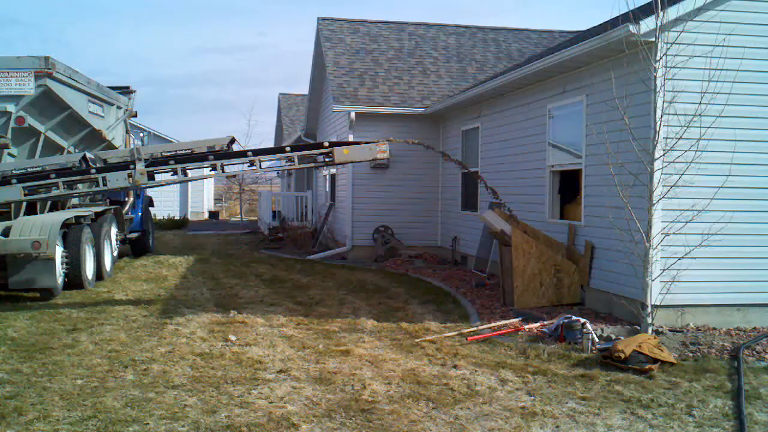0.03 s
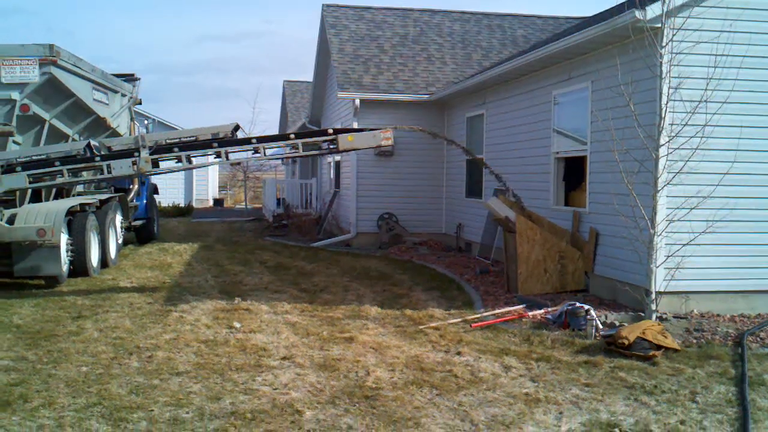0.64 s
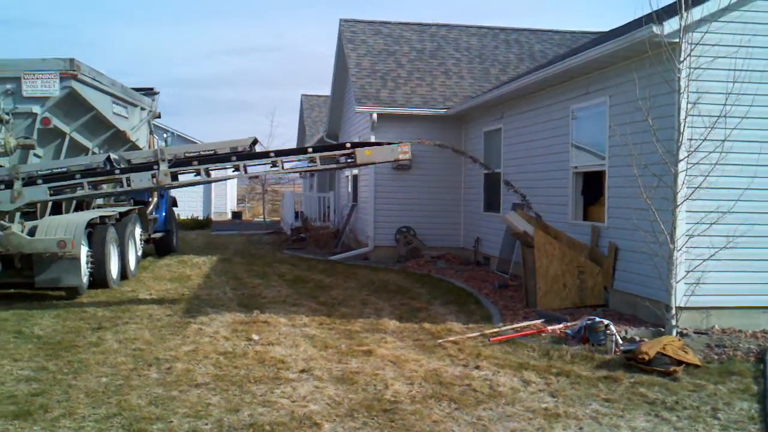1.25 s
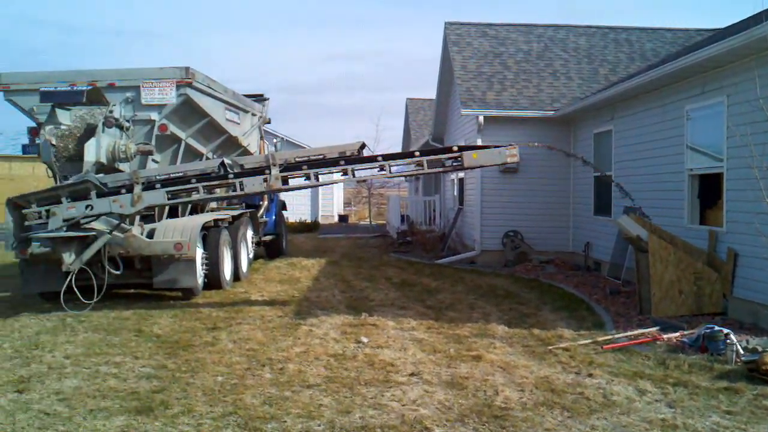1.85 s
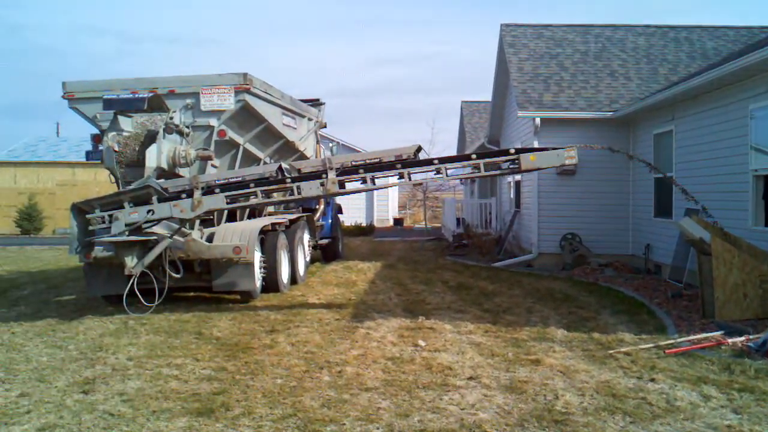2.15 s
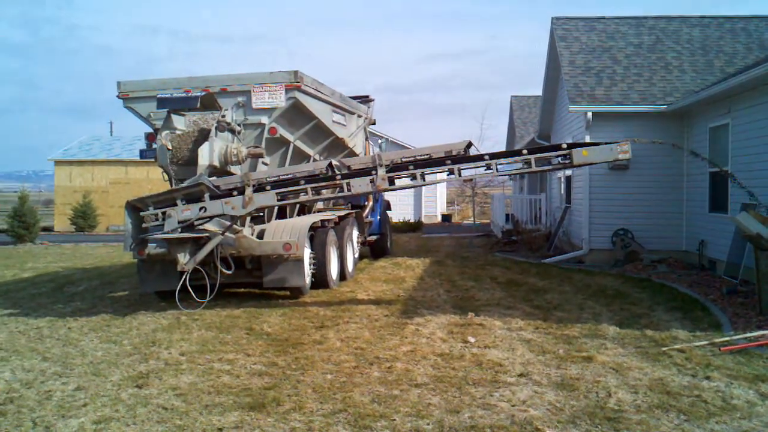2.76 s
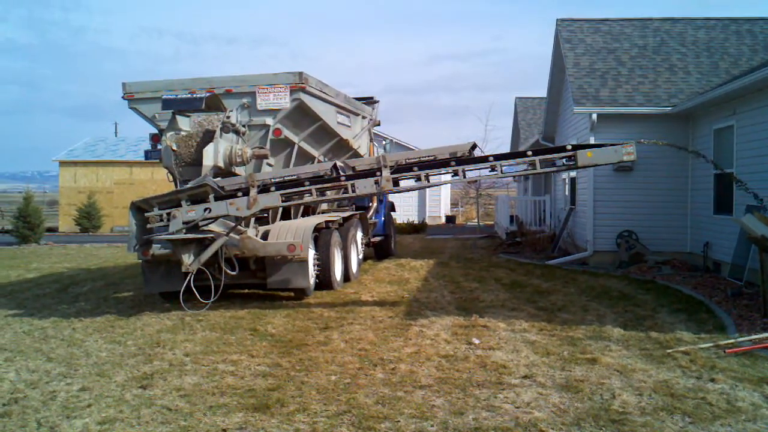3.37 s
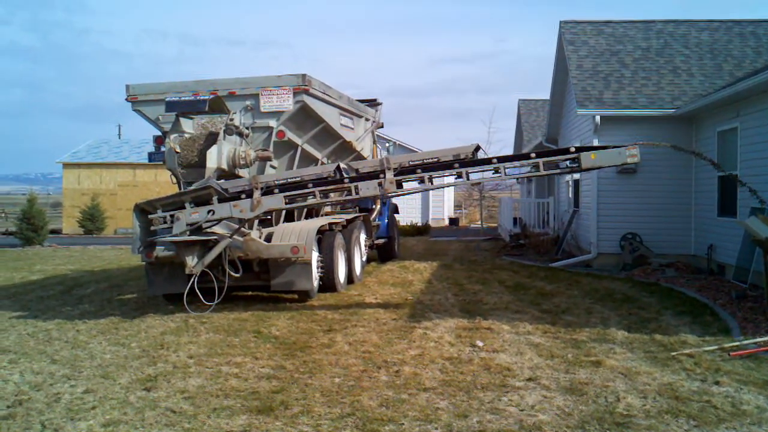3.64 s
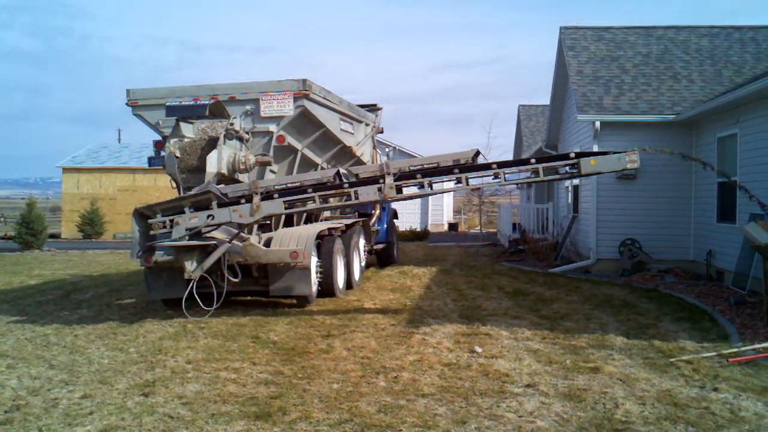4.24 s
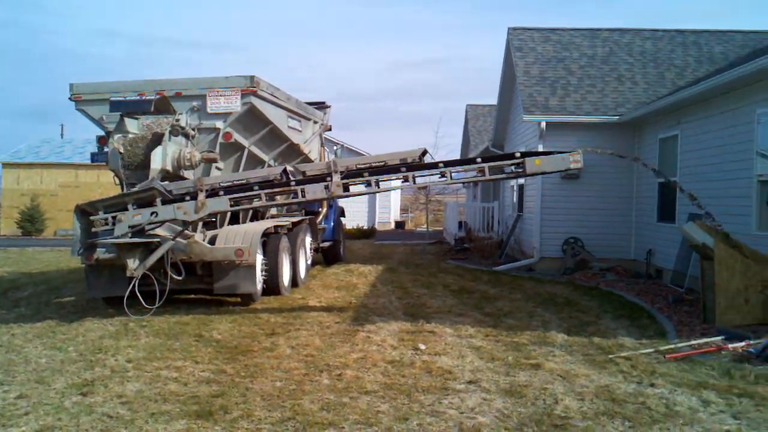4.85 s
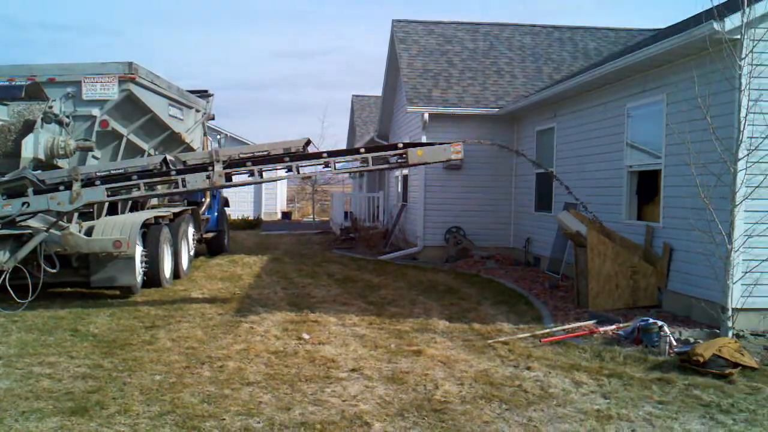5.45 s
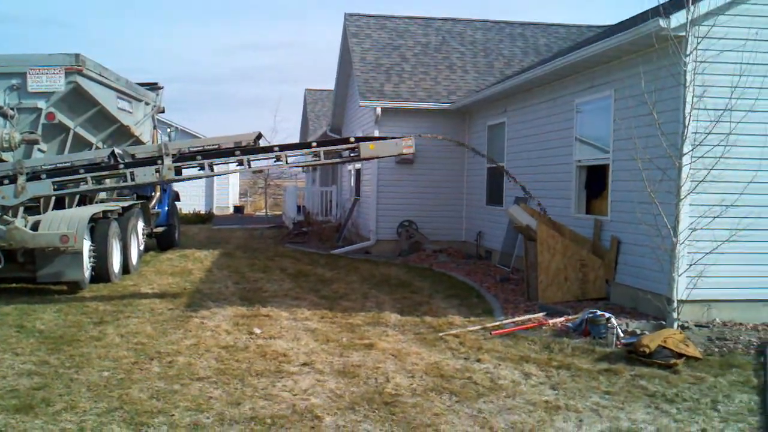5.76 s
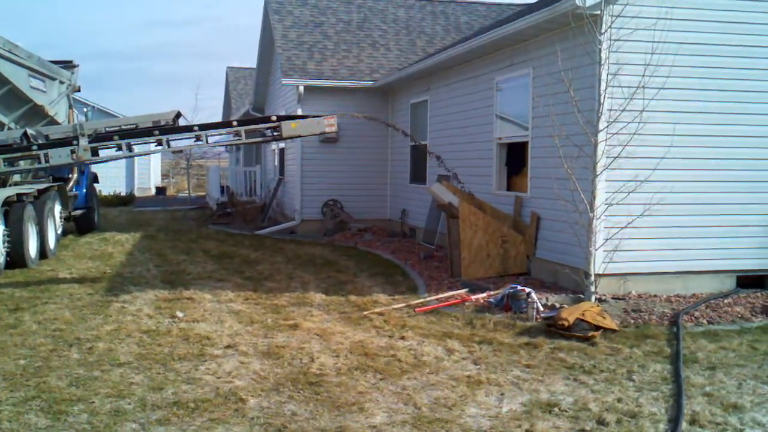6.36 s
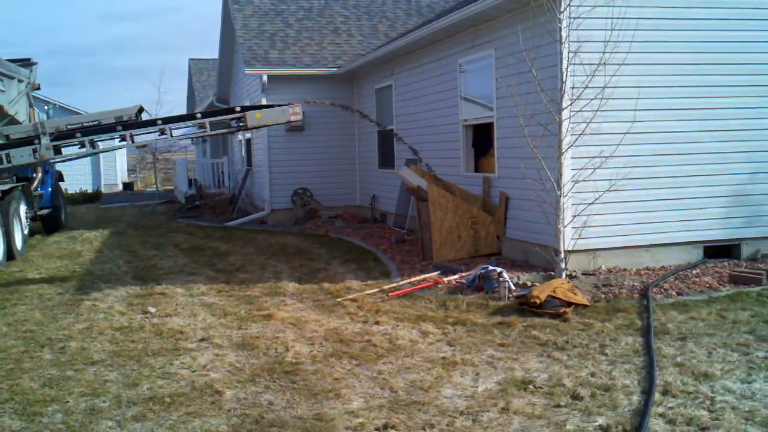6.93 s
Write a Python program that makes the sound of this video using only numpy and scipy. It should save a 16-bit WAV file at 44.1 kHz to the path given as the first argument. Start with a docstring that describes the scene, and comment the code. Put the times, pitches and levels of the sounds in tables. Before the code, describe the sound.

Gravel pours onto a wooden chute with constant rattling and occasional knocks, over a loud, high-revving diesel truck outdoors.

```python
"""A conveyor truck runs at high revs on a lawn and slings gravel down a plywood chute at a house window.
Its diesel engine roars and throbs, and its hydraulic pump whines on one note. The gravel drums on the
board, stones rattle against each other, and now and then a big one lands with a knock.
The sound fades in, heard through a widened stereo microphone that turns toward the truck and back."""
import sys
import numpy as np
from scipy import signal
from scipy.fft import rfft, irfft, next_fast_len
from scipy.io import wavfile
from scipy.ndimage import map_coordinates

SR = 44100
rng = np.random.default_rng(int(sys.argv[2]) if len(sys.argv) > 2 else 0)


def unload_wav(signal):
    """Save mono or channel-first audio to the path in sys.argv[1] as 16-bit WAV at rate SR, clipped to [-1, 1]."""
    wavfile.write(
        sys.argv[1],
        SR,
        np.round(np.clip(np.atleast_2d(signal).T, -1, 1) * 32767).astype(np.int16),
    )


N = 317520

# tone of the exhaust and fan noise: (frequency [Hz], level [dB])
ROAR_TONE = [(25, -41), (50, -31), (95, -21), (118, -9), (145, -6), (175, 0.5), (215, 1.5), (290, -0.5),
             (400, -1), (490, -4.5), (900, -12.5), (1600, -11), (2600, -34.5)]
# notes in the engine's hum: (frequency [times the crankshaft rate], level [dB])
HUM_NOTES = [(3, -27), (4, -17), (6, -8), (7, -2), (8, -5.5), (9, -5.5), (12, -6.5)]
# notes the plywood chute rings at: (frequency [Hz], width [Hz], level [dB])
BOARD_NOTES = [(533.5, 29.6, -6.5), (616.8, 88.4, 0.5), (715, 133, 1.5), (959, 232, -9.5), (1387, 264, -13),
               (2250, 360, -21)]
# how much gravel leaves the belt: (time [s], flow above average [dB])
GRAVEL_FLOW = [(0.98, -1.5), (1.28, 0), (1.58, -0.45), (2.18, -0.7), (2.88, 0.6), (3.48, -0.5), (3.68, 0.5),
               (3.88, -0.4), (4.38, 1.0), (4.78, 0.1), (5.08, 1.2), (5.18, -0.7), (5.48, -1.4), (5.78, 0.4),
               (6.28, 1.5), (6.38, 0.2), (7.18, 0.7)]
# tone of the stone rattle: (frequency [Hz], level [dB])
RATTLE_TONE = [(400, -45), (1200, 10.5), (2200, 9), (2700, 4.5), (3300, -1), (4200, 5), (5400, -4.5),
               (6500, -0.5), (7800, 0), (9200, 0.5), (11000, -6.5), (14000, -0.5)]
# big stones hitting the board: (time [s], strength [dB])
BIG_STONE_HITS = [(0.912, -11), (1.331, -6.5), (2.219, -4.5), (4.451, -7.5), (4.556, -8.5), (5.009, -10),
                  (6.007, -10.5), (6.581, -7), (6.834, -14), (7.145, -10)]
# level of mid (what left and right share) and side (what sets them apart),
# with a narrow hollow in the mid near 2.7 kHz: (frequency [Hz], mid [dB], side [dB])
STEREO_WIDTH = [(30, -1, 0), (86.8, -0.5, 3), (170, -1, -20), (424, 1, -8.5), (680, -0.5, -17),
                (1030, 0, -14), (1820, -3.5, -2.5), (2150, 2.5, -6), (2393, -1, -4), (2720, -20, -6),
                (2836, 0, -8), (3300, 0, -2), (5000, 0, -0.5), (13000, -0.5, 0)]
# where the microphone points: (time [s], direction [0 = house, 1 = truck])
MIC_HEADING = [(1.45, 0.43), (2.08, 0.71), (2.65, 0.87), (4.6, 0.9), (5.15, 0.63), (5.8, 0.37)]
# the microphone's tone: (frequency [Hz], facing the house [dB], facing the truck [dB])
MIC_TONE = [(100, -2.5, 0.5), (616, 0.5, -.5), (965, -2.5, .5), (1380, 0.5, -1.5), (2200, 0.5, -8),
            (3300, -7.5, 6), (3800, -0.5, 0), (4750, -1.5, -1.5), (5940, 7, -6), (7270, -9.5, 0.5),
            (8900, 5, -6.5), (11600, -4, 1.5), (13500, -6.5, -9.5)]
# how much louder left is than right: (frequency [Hz], facing the house [dB], facing the truck [dB])
MIC_BALANCE = [(35, 0, 4), (100, -2, -6.5), (440, 7, -1.5), (705, 3.5, -2), (1330, 3, -9.5),
               (1710, -7, -8.5), (2280, 3, 19.5), (3040, 6, -14), (3960, 4, -3), (6000, -1.5, 3),
               (8000, 0, -0.5)]
# how much of the other channel the widener subtracts: (frequency [Hz], from left [0-1], from right [0-1])
WIDENER_SHARE = [(404, .02, 0.017), (820, 0.25, 0.27), (1280, 1, 0.92), (2650, 1, 1), (4270, 0.51, 0.64),
                 (4700, 0.34, 0.13), (5370, 0.25, 0.62), (5770, .03, 0.46), (13000, .03, 0.36)]

CRANKSHAFT_HZ, ENGINE_DB = 29.13, -31.5
PUMP_HZ, PUMP_DB = 716.3, -33.0
DRUM_DB, DRUM_GROWTH = -21.5, 0.8  # growth: dB gained per dB of gravel flow
RATTLE_DB, RATTLE_GROWTH, RATTLE_FACING_TRUCK_DB = -27.5, 1.1, 0.55
BELT_SHAKE_HZ = 17.6  # how often the belt shakes a clump loose
COMB_HOUSE_HZ, COMB_TRUCK_HZ = 2774, 2496  # one over the widener's delay, facing each way
FADE_START_S, FADE_END_S = 0.711, 0.96
TOP_HZ = 13910  # the highest pitch heard


def amp(db):
    """Turn decibels into a number to multiply by."""
    return 10 ** (np.asarray(db) / 20)


def unit(x):
    """Scale a sound to an average (rms) level of 1."""
    return x / np.sqrt(np.mean(x ** 2) + 1e-20)


def at_pitch(table, hz):
    """Read a table's columns at the given frequencies, on a log scale."""
    freqs, *columns = np.transpose(table)
    return np.squeeze([np.interp(np.log(hz + 1), np.log(freqs + 1), column) for column in columns])


def over_time(table):
    """Join (time, value) rows with straight lines, one value per sample."""
    times, values = np.transpose(table)
    return np.interp(np.arange(N) / SR, times, values)


def wobble(rate):
    """A smooth curve through `rate` random values a second."""
    return map_coordinates(rng.standard_normal(int(N * rate / SR) + 4), [np.arange(N) * rate / SR])


def filtered(x, response):
    """Change a sound's tone: multiply each frequency by response(hz)."""
    size = next_fast_len(N + SR // 2)
    hz = np.fft.rfftfreq(size, 1 / SR)
    return irfft(rfft(x, size) * response(hz), size)[..., :N]


def impacts(per_second, spread_db):
    """Tiny blows at random times and of random size, as mid and side."""
    hits = rng.random((2, N)) < per_second / SR
    signs = np.sign(rng.standard_normal((2, N)))
    sizes = amp(spread_db * rng.standard_normal((2, N)))
    return unit(hits * signs * sizes)


def diesel_engine():
    """Six cylinders fire three times a turn, so the exhaust and fan noise throbs over the shaft's hum."""
    angle = 2 * np.pi * np.cumsum(CRANKSHAFT_HZ * (1 + 0.00394 * wobble(3.015))) / SR
    firing = np.cos(3 * angle)
    throb = amp(1.4 * firing + 1.06 * wobble(11))
    rough_noise = throb * impacts(5000, spread_db=1.5)
    roar = unit(filtered(rough_noise, lambda hz: amp(at_pitch(ROAR_TONE, hz))))
    hum = unit(sum(amp(db + 2.3 * wobble(9)) * np.sin(multiple * angle + 0.7 * wobble(14))
                   for multiple, db in HUM_NOTES))
    return roar + amp(-7.0) * hum * [[1], [0]]  # the hum is mid only


def hydraulic_pump():
    """The conveyor's pump whines on one note that wavers in the moving air."""
    phase = 2 * np.pi * np.cumsum(PUMP_HZ * (1 + 0.0025 * wobble(12))) / SR
    whine = unit(np.array([np.sin(phase), np.cos(phase)]))
    return amp(3.9 * wobble(7)) * whine


def plywood_board(hz):
    """How strongly the chute answers each frequency: it bends and rings briefly at a few notes."""
    return sum((-1) ** k * amp(db) * 1j * hz * width / (note ** 2 - hz ** 2 + 1j * hz * width)
               for k, (note, width, db) in enumerate(BOARD_NOTES))


def gravel_drumming():
    """The stream of gravel drums on the plywood, a little unevenly."""
    blows = impacts(4000, spread_db=2) * amp(wobble(60))
    return unit(filtered(blows, plywood_board))


def pebble_clinks(count, ring_s):
    """Small stones clink, each at its own pitch, and die away in a few milliseconds."""
    when, pitch, phase = rng.random((count, 3)).T[:, :, None]
    t = np.arange(SR // 100) / SR
    hz = 2000 + pitch * (TOP_HZ - 2000)
    clinks = np.sin(2 * np.pi * (hz * t + phase)) * np.exp(-t / ring_s)
    positions = (when * N).astype(int) + np.arange(len(t))
    return unit(np.bincount(positions.ravel(), clinks.ravel(), N)[:N])  # add each clink at its time


def gravel_rattle():
    """Stones clink over the hiss of sliding grit; each clump lands at once, then trickles away."""
    clinks = np.array([pebble_clinks(count=6000, ring_s=0.0063) for _ in range(2)])
    hiss = rng.standard_normal((2, N))
    shake_count = np.floor(np.cumsum(BELT_SHAKE_HZ * (1 + 0.13 * wobble(12))) / SR)
    landings = (np.diff(shake_count, prepend=0) > 0) * amp(5.9 * wobble(20))
    trickle_s = 0.039
    clumps = signal.lfilter([1], [1, -np.exp(-1 / (trickle_s * SR))], landings)
    rattle = (0.5 * clinks + hiss) * np.sqrt(1 + 0.6 * clumps)
    return unit(filtered(rattle, lambda hz: amp(at_pitch(RATTLE_TONE, hz))))


def big_stones():
    """Single heavy stones ring the same board; they touch it for longer, which dulls the knock."""
    blows = np.zeros(N)
    for time_s, db in BIG_STONE_HITS:
        blows[round(time_s * SR)] = amp(db)
    knocks = filtered(blows, lambda hz: plywood_board(hz) / (1 + 1j * hz / 600) ** 2)  # dull above 600 Hz
    peak = amp(-3.0) * blows.max()
    return peak * knocks / np.abs(knocks).max() * [[1], [0]]  # mid only


def left_and_right(mid_side):
    """Set the level of mid and side at each frequency, then mix them into left and right."""
    mid, side = filtered(mid_side, lambda hz: amp(at_pitch(STEREO_WIDTH, hz)))
    return np.array([mid + side, mid - side])


def mic_turn(facing_house, facing_truck):
    """Blend two versions of a sound as the microphone turns."""
    heading = over_time(MIC_HEADING)
    return (1 - heading) * facing_house + heading * facing_truck


def stereo_mic(left_right):
    """Tone and balance depend on where the microphone points."""
    lean = np.array([[0.5], [-0.5]])  # half the balance raises the left, half lowers the right
    gain = lambda hz: amp(at_pitch(MIC_TONE, hz)[:, None] + lean * at_pitch(MIC_BALANCE, hz)[:, None])
    return mic_turn(*filtered(left_right, gain))


def scene():
    """Truck and gravel together at the microphone; a fuller belt drums and rattles louder."""
    flow_db = over_time(GRAVEL_FLOW)
    truck = amp(ENGINE_DB) * diesel_engine() + amp(PUMP_DB) * hydraulic_pump()
    drumming = amp(DRUM_DB + DRUM_GROWTH * flow_db) * gravel_drumming()
    facing_db = RATTLE_FACING_TRUCK_DB * over_time(MIC_HEADING)
    rattle = amp(RATTLE_DB + RATTLE_GROWTH * flow_db + facing_db) * gravel_rattle()
    return stereo_mic(left_and_right(truck + drumming + rattle + big_stones()))


def record(dry):
    """Widen the sound by taking a delayed bit of each channel from the other; fade in and cut the top."""
    swapped = dry[::-1]
    delayed = [filtered(swapped, lambda hz: at_pitch(WIDENER_SHARE, hz) * np.exp(-2j * np.pi * hz / comb))
               for comb in (COMB_HOUSE_HZ, COMB_TRUCK_HZ)]
    wide = dry - mic_turn(*delayed)
    fade_in = over_time([(FADE_START_S, 0), (FADE_END_S, 1)]) ** 0.98
    return filtered(wide * fade_in, lambda hz: np.clip((TOP_HZ - hz) / 100 + 0.5, 0, 1))


dry = scene()
out = record(dry)
unload_wav(out)
```